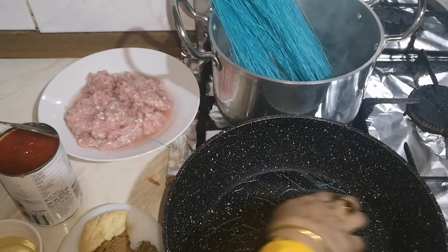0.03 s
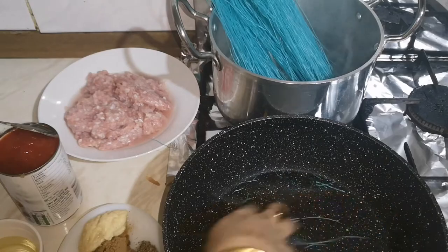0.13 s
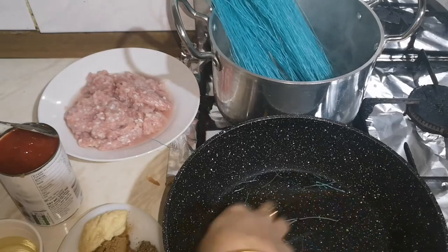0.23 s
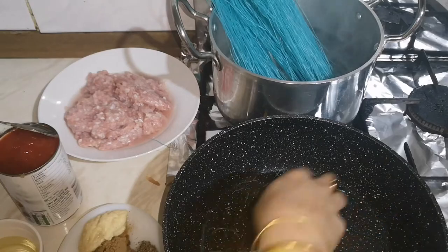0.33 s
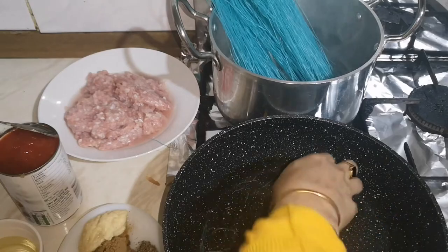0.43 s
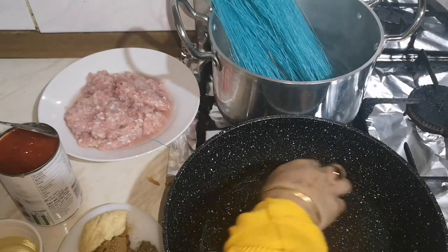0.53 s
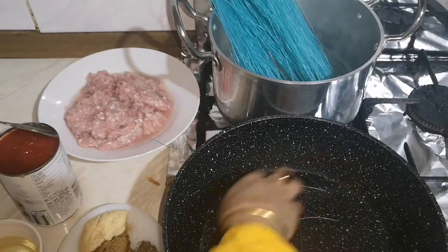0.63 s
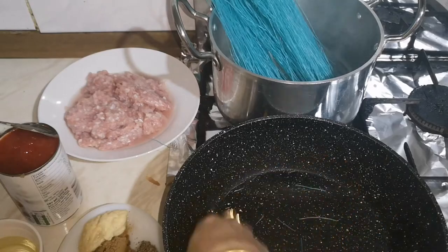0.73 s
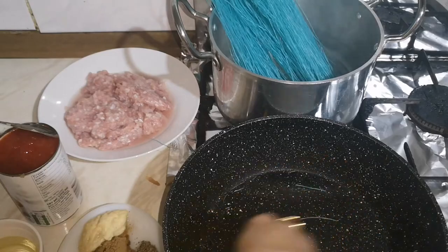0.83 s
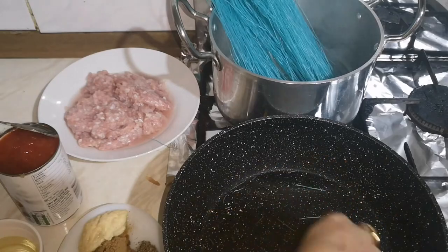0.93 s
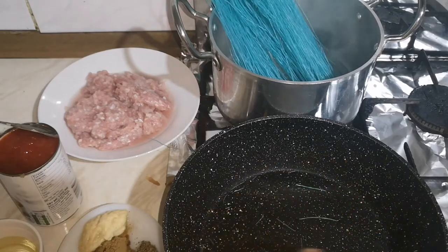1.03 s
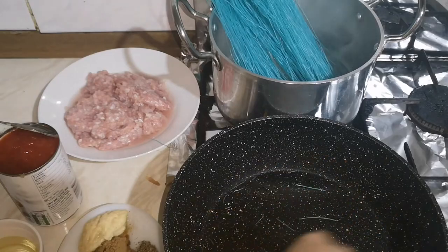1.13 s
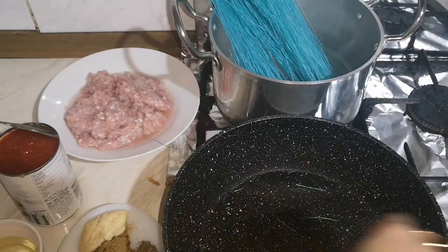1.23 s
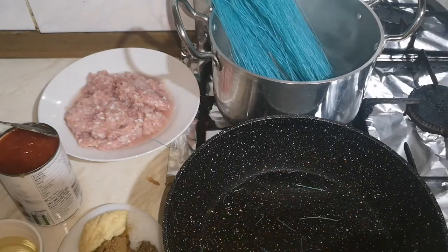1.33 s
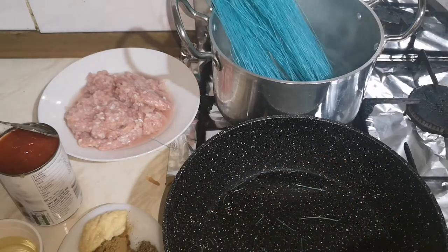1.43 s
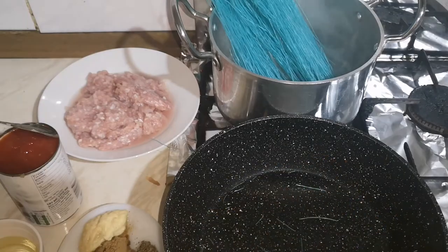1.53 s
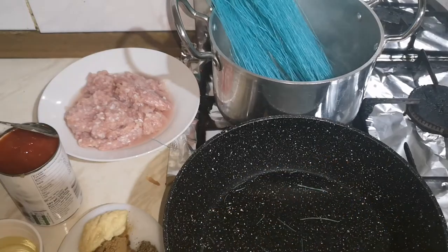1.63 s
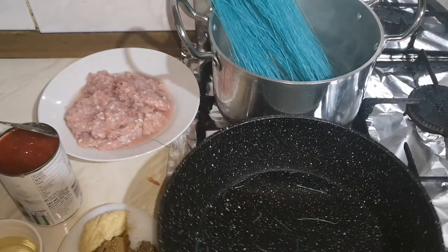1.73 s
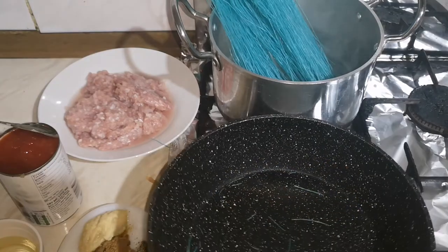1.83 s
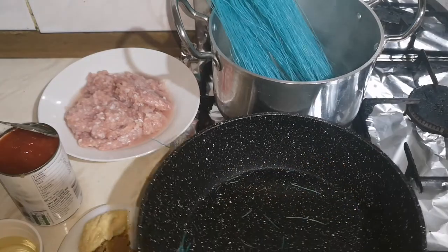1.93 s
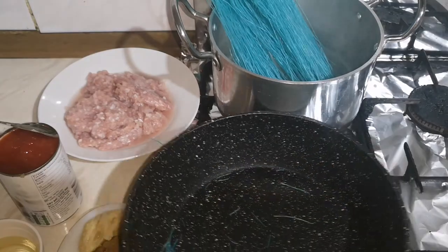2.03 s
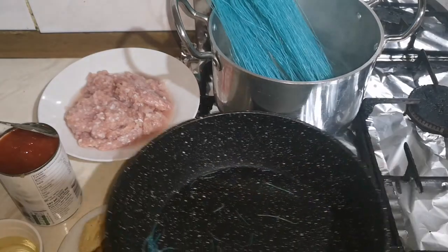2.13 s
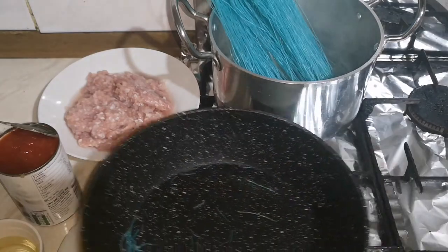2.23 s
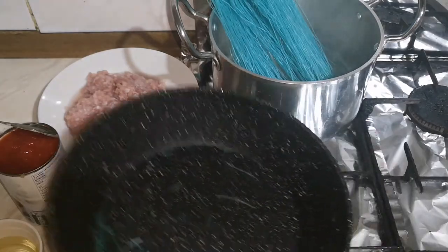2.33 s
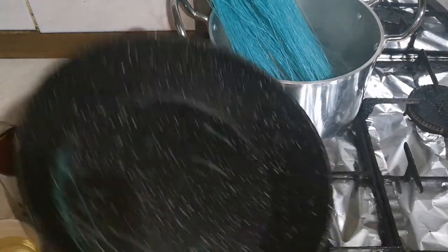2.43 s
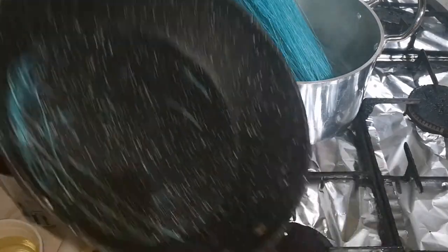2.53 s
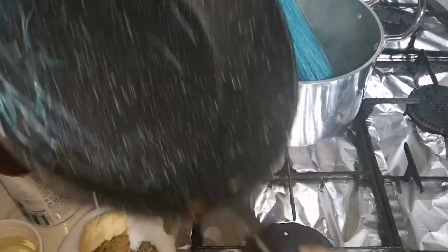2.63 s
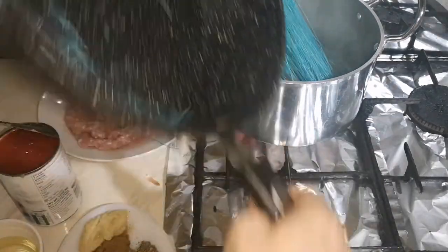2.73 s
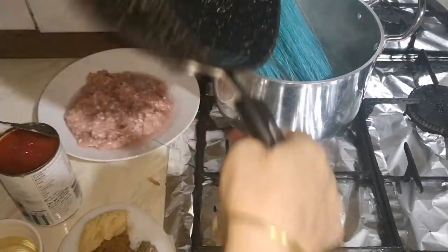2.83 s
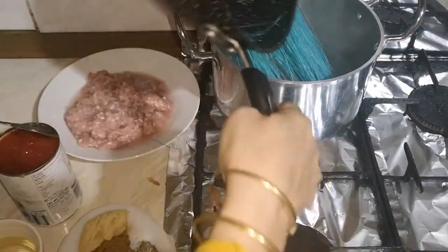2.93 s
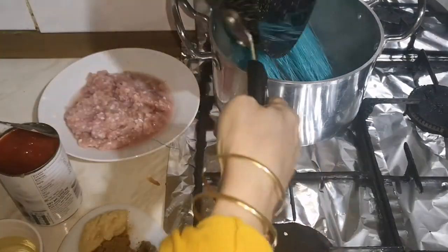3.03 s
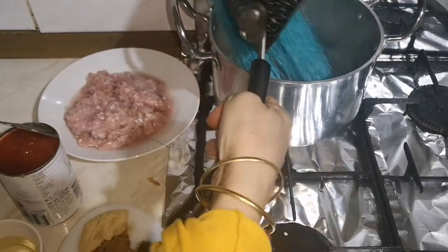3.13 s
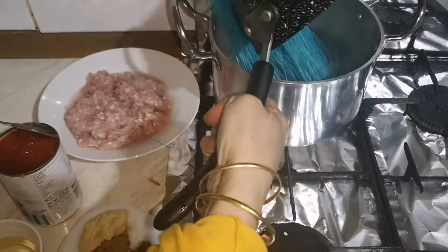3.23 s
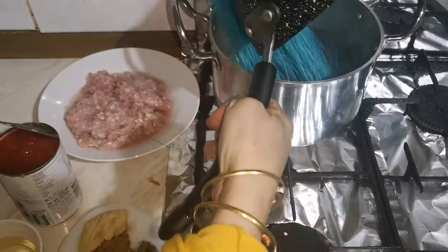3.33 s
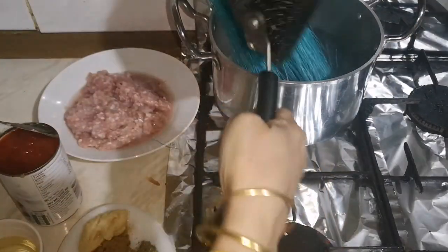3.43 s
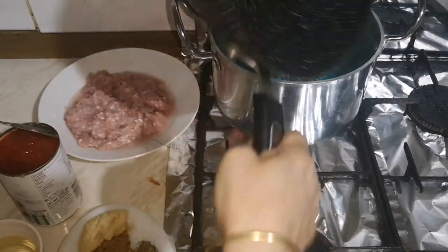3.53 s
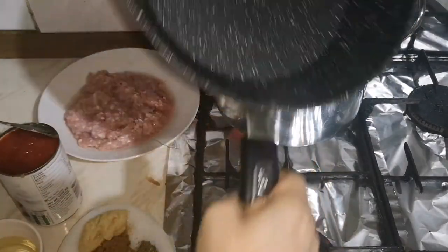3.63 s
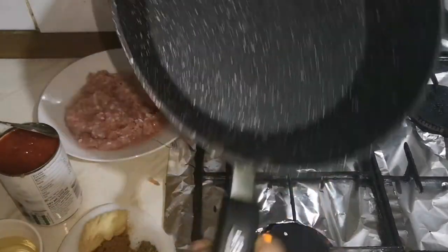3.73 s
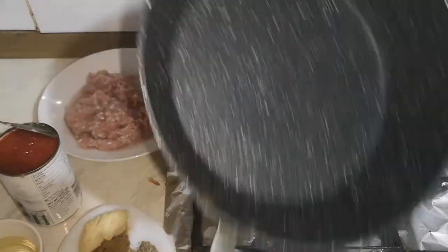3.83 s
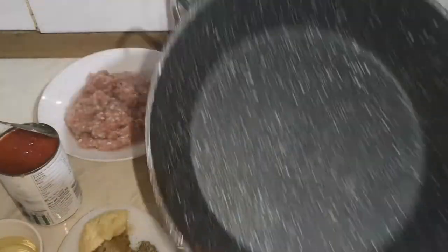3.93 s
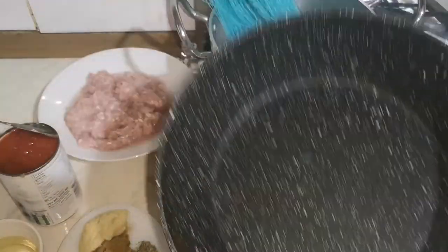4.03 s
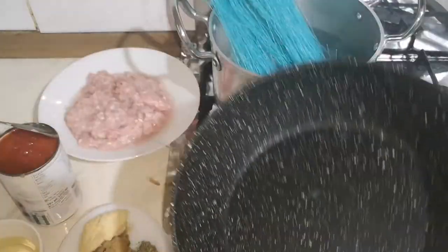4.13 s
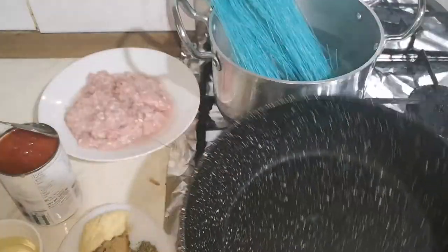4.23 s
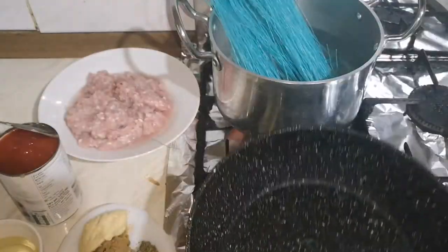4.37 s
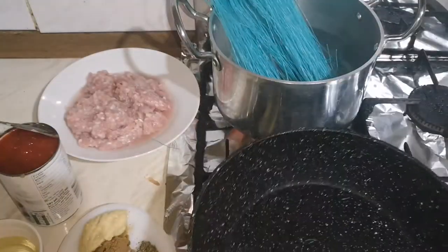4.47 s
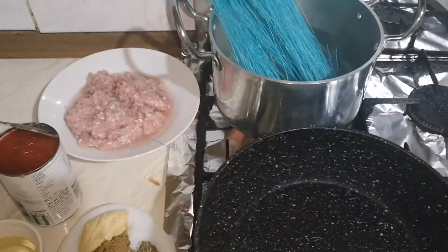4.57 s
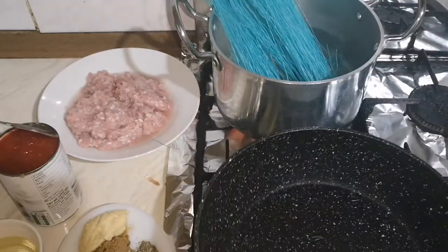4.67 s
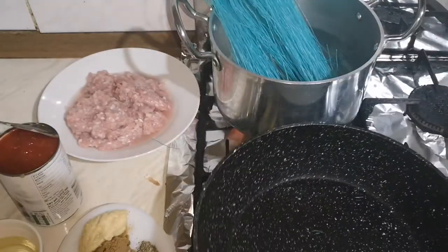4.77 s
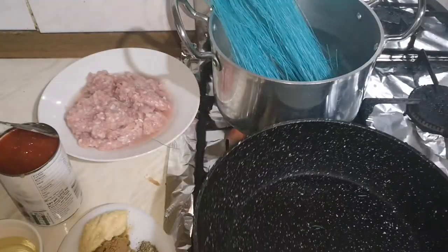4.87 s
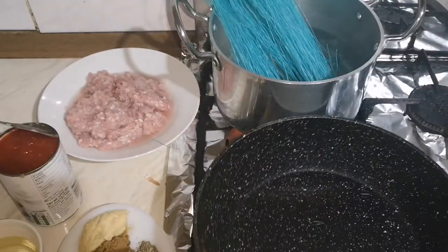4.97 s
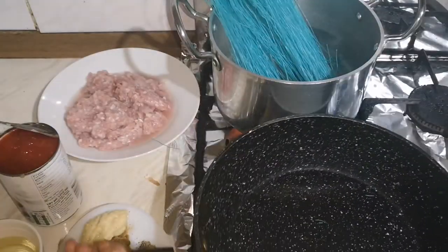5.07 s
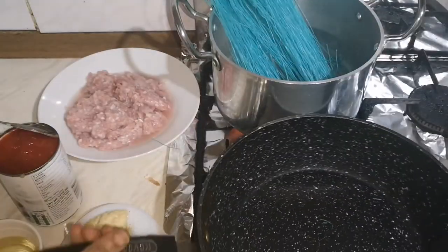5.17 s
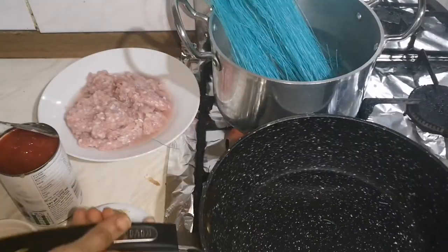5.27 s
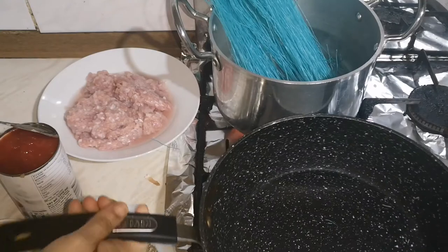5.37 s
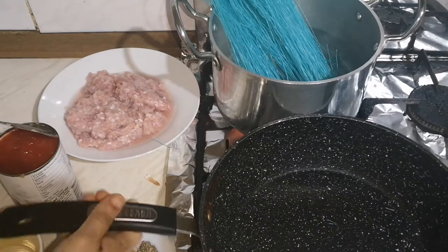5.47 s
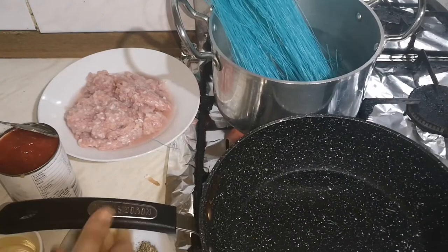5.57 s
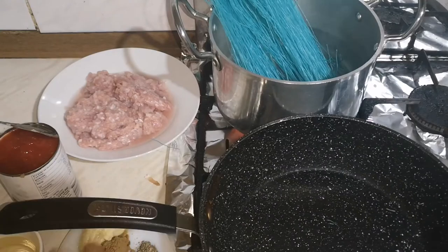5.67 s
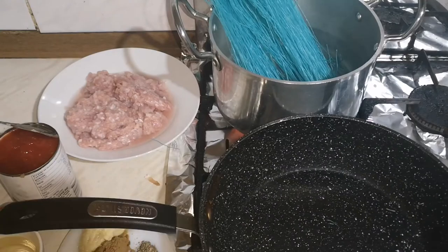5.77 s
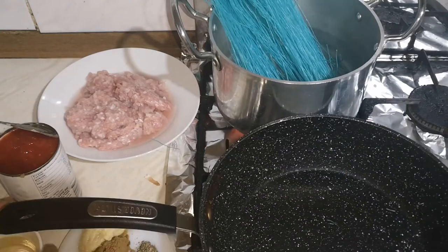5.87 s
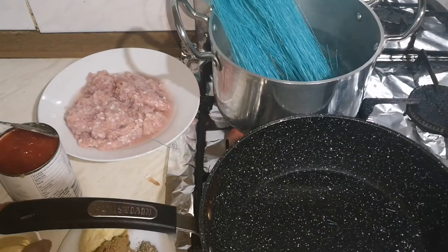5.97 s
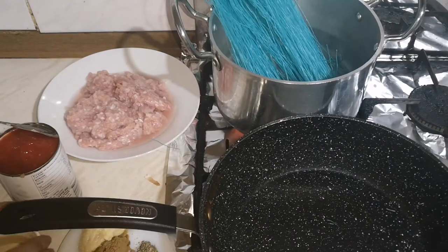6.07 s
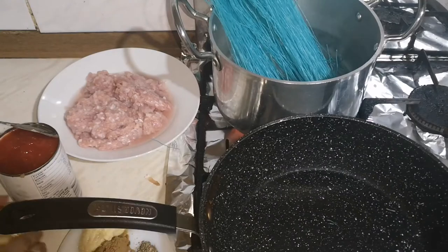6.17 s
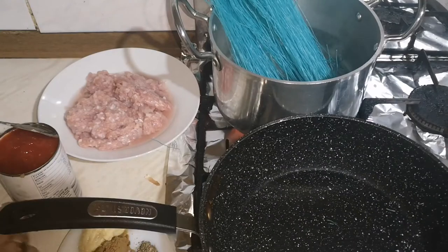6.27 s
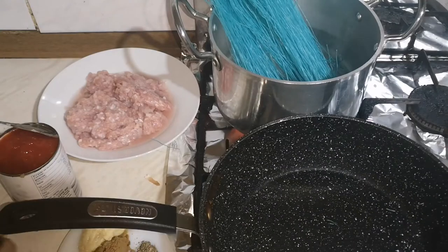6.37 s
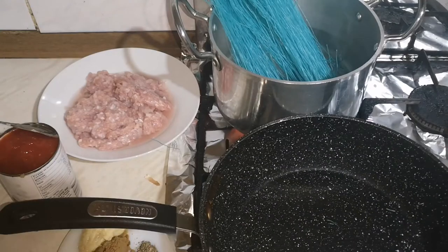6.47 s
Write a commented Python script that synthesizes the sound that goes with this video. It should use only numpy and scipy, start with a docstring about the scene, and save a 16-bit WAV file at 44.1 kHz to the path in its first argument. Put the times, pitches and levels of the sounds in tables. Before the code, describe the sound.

Close by in a small kitchen, a hand rubs a frying pan in quick, gritty strokes that make it ring. The pan knocks and scrapes off the stove grate, then crumbs slide out and fizz briefly in hot water. The handle clicks, and the pan lands with a loud metallic clatter and low thuds. A short slide, faint bangle clinks and a sleeve rustle follow. A gas burner rumbles softly throughout.

```python
"""In a small kitchen, a hand wipes out a nonstick frying pan and drags it off the grate of a gas stove. Rubbing
and knocking make the metal ring, and the handle clicks as the pan tips. Crumbs slide down into a pot of hot
water and fizz. The pan is set down with a clatter that shakes the stove, bangles clink as the hand lets go, and
a slipper scuffs softly on the floor. A burner rumbles softly throughout."""
import sys
import numpy as np
from scipy import signal
from scipy.fft import rfft, irfft, next_fast_len
from scipy.io import wavfile

SR = 44100
rng = np.random.default_rng(int(sys.argv[2]) if len(sys.argv) > 2 else 0)


def master_out(mix):
    """Clip the mix to full scale and print it as 16-bit PCM to the path in sys.argv[1]."""
    frames = np.transpose(np.atleast_2d(mix))
    ceiling = np.clip(frames, -1, 1)
    pcm = np.round(ceiling * 32767).astype(np.int16)
    wavfile.write(sys.argv[1], SR, pcm)


N = 286729
TIME = np.arange(N) / SR  # seconds since the scene began
AGE = TIME[:SR * 3 // 4]  # seconds since one short sound began
CONTACT_DAMPING = 1.3  # touched by a hand or the grate, the pan stops ringing this many times sooner

# The notes the pan rings with. A fade time is how long a sound takes to drop by 60 dB.
# Columns: pitch_hz, fade_s, struck_outside_db, rubbed_inside_db
PAN_NOTES = [(594, .12, -18, -12), (619, .3, -5, -13), (755, .14, -15, -15), (1074, .08, -9, -19),
             (1153, .12, -7, 0), (1184, .26, -7.5, -8), (1552, .09, -8, -17), (1657, .08, -7, -22),
             (1775, .07, -6, -14), (1887, .13, 2, -8), (1930, .16, -6, -3), (1985, .08, -7, -16),
             (2425, .13, -12.5, -8.5), (2520, .12, -13, -21), (2700, .08, -11, -17), (2895, .12, -7.5, -9),
             (3385, .13, -10, -13), (4028, .18, -6, -15), (4595, .14, -11, -19), (4730, .07, -10, -20),
             (5277, .14, -7, -10), (5440, .09, -8, -19), (5960, .14, -15, -18), (6325, .1, -11, -13),
             (6620, .12, -12, -16), (6950, .08, -12, -18), (7222, .12, -16, -12), (8190, .12, -20, -16)]
STRUCK = [(hz, db, fade_s) for hz, fade_s, db, _ in PAN_NOTES]
STROKED = [(hz, db, fade_s) for hz, fade_s, _, db in PAN_NOTES]
# The tone (how strong each pitch is) of pan and grate clanking. Columns: pitch_hz, level_db
CLANK_TONE = [(60, -28), (300, -8.5), (550, -6), (1000, 2), (1750, -0.5), (2300, -2), (3500, 0.5),
              (5500, 0.5), (7200, -2.5), (9500, -10), (12000, -25.5), (15500, -32.5)]


def struck_pan(clank_db, damping, clank_fade_s=0.06, crack_db=-2.0, crack_fade_s=0.02):
    """One blow on the pan: clear notes ring on after a short, noisy crack and clank."""
    crack = colour(noise(len(AGE)) * fade(crack_fade_s), [(1000, 1), (6000, 2.5), (12000, -7.0)])
    clank = unit(noise(len(AGE)) * fade(clank_fade_s)) + amp(crack_db) * unit(crack)
    notes = ring(STRUCK, scatter_db=2, damping=damping)
    return (notes + amp(clank_db) * unit(colour(clank, CLANK_TONE))) * rise(.0008)


# The pan hits the grate. Columns: start_s, level_db, treble_loss_db, thump_db, left_over_right_db
PAN_KNOCKS = [(0.5748, -38, 7, -50, 7), (1.601, -35, 34, -40, 3), (1.762, -45.5, 11, -64, 2.5),
              (1.879, -36, 33, -49, 0), (1.908, -39, 20, -47, 3), (1.967, -34, 16.5, -42, 4),
              (2.146, -46.5, 57, -46.5, 9), (4.4302, -36.5, 5, -63, -3), (4.4345, -13, 3, -28.5, 0),
              (4.463, -18.5, 6, -49, 2.5), (4.5959, -17, 5.5, -32, -0.5), (4.6608, -16.5, 8, -29.5, -2),
              (4.6909, -21.5, 9.5, -30.5, 0.5), (4.7174, -22.5, 9, -28, -1), (4.805, -19, 10.5, -26.5, 2),
              (5.0533, -36.5, 12, -36, 0), (5.295, -49, 0.5, -62, -0.5)]
# The low notes of the grate and stove top. Columns: pitch_hz, level_db, fade_s
STOVE_NOTES = [(53, -9, .35), (114, 0, .36), (155, -8, .22), (292, -14, .3), (313, -15, .3)]
# The stove's dull thud. Columns: pitch_hz, level_db
THUD_TONE = [(25, -13.5), (50, 3), (100, -1), (190, -4.5), (300, -21), (500, -18), (1500, -47.5)]


def knocks(stove_rise_s=.008, thud_db=-3.5, thud_fade_s=0.36):
    """Each knock rings the pan, brighter for a harder contact; the heavy stove shakes a moment later."""
    pan, stove = np.zeros((2, 2, N))
    for start_s, db, dull_db, thump_db, side_db in PAN_KNOCKS:
        mid_db = -5 + 0.58 * dull_db  # a duller blow puts more into the pan's lowest notes
        tone = [(600, 0.5 * mid_db - 2.5), (1150, mid_db), (1800, 0.0016),
                (2400, -.25 * dull_db), (4200, -dull_db)]
        blow = colour(struck_pan(clank_db=1.2, damping=CONTACT_DAMPING), tone)
        add(pan, start_s, sides(side_db) * starting_at(db, blow))
        thud = unit(colour(noise(len(AGE)), THUD_TONE) * fade(thud_fade_s))
        thump = (ring(STOVE_NOTES) + amp(thud_db) * thud) * rise(stove_rise_s)
        add(stove, start_s, starting_at(thump_db, thump, first_s=0.05))
    return pan, stove


# The hand sweeps over the pan. Columns: touch_s, fastest_s, half_length_s, ring_db, hiss_db
HAND_STROKES = [(0.0, 0.177, 0.072, -36, -40), (.31, 0.312, 0.087, -74, -54),
                (0.538, 0.601, 0.086, -34.5, -52.5), (0.59, 0.717, 0.075, -28.5, -35),
                (.82, 0.862, 0.037, -75, -51.5), (1.061, 1.088, 0.051, -36.5, -56),
                (5.45, 5.518, 0.046, -59.5, -72.5)]


def strokes(touch_rise_s=0.0016, rock_db=-19):
    """The hand lands, speeds up and slows; returns how strongly the pan rings, hisses and rocks."""
    ringing, hissing, rocking = np.zeros((3, N))
    for touch_s, fastest_s, half_length_s, ring_db, hiss_db in HAND_STROKES:
        contact = rise(touch_rise_s, np.maximum(TIME - touch_s, 0))
        speed = 1 / (1 + ((TIME - fastest_s) / half_length_s) ** 2)
        # All three grow with speed: the ring most steeply, the rocking least.
        ringing = np.hypot(ringing, contact * amp(ring_db) * speed ** 3.02)
        hissing = np.hypot(hissing, contact * amp(hiss_db) * speed ** 1.92)
        rocking = np.hypot(rocking, contact * amp(ring_db + rock_db) * speed ** 0.88)
    return ringing, hissing, rocking


# Rubbing on the pan: its low, gritty and hissing parts. Columns: pitch_hz, level_db
SKIN_TONE = [(200, -10), (430, -11.5), (600, 3), (900, 1.5), (1200, 7), (1900, 4), (3000, -12.5),
             (6000, -24.5)]
GRIT_TONE = [(900, -13.5), (1600, 2.5), (2400, 1), (3200, 2.5), (4100, -0.5), (5300, 2), (7000, -8),
             (12000, -26)]
HISS_TONE = [(1000, -30.5), (3000, -13), (5000, -7), (6200, 1), (7200, 2.5), (9300, -0.5), (11000, -14.5),
             (15000, -21.5)]


def wipes():
    """Skin rubs the coating and damps the pan; the more it hisses, the more the high notes ring."""
    ringing, hissing = np.array(strokes()[:2]) * slips(per_s=3000, spread_db=1.0)
    low = rubbed(ringing, STROKED, SKIN_TONE, direct_db=-2)
    grit = rubbed(np.sqrt(ringing * hissing), STROKED, GRIT_TONE, direct_db=-5)
    hiss = rubbed(hissing, STROKED, HISS_TONE, direct_db=1.5)
    return low + amp(2.0) * grit + sides(0.99) * echoes(hiss)


# One pull drags the pan off the grate. Columns: time_s, scrape_db, hiss_db
PULL_LEVELS = [(1.68, -56, -68.5), (1.716, -57.5, -74), (1.794, -43.5, -52.5), (1.92, -46.5, -65),
               (1.99, -41.5, -57.5), (2.08, -50, -57), (2.174, -40.5, -58.5), (2.25, -73, -98),
               (2.3, -128, -84)]
# The pan slides a little further after landing. Columns: start_s, length_s, level_db
LANDING_SLIDES = [(4.925, 0.036, -56), (5.053, 0.22, -47.5)]
# The pull's scrape, the stove's shudder under it, and the landing slides. Columns: pitch_hz, level_db
IRON_TONE = [(200, -3.5), (450, 14.5), (750, 9), (1160, 9), (1900, 0.5), (3000, 0.5), (5000, -14),
             (7000, -16), (12000, -30)]
SHUDDER_TONE = [(25, -4), (50, 5.5), (100, -6.5), (190, -0.5), (300, -8), (500, -26), (1500, -54)]
SLIDE_TONE = [(200, 3), (620, 3.5), (1200, 3.5), (1930, 0), (2500, 2.5), (4100, -10), (5400, -25.5),
              (7000, -1), (12000, -34)]


def drags():
    """The pan scrapes over cast iron; the stove rumbles under that and when wiping rocks the pan."""
    catches = slips(per_s=500, spread_db=3.5)
    pull, pull_hiss = levels(PULL_LEVELS) * catches
    slide = catches * sum(amp(db) * push(start_s, length_s, rise_s=.01, fade_s=0.76, sag_db_per_s=46)
                          for start_s, length_s, db in LANDING_SLIDES)
    scrape = rubbed(pull, STRUCK, IRON_TONE, direct_db=3.5)
    scrape += rubbed(slide, STRUCK, SLIDE_TONE, direct_db=2.5)
    hiss = rubbed(amp(3.0) * pull_hiss + amp(-8) * slide, STRUCK, HISS_TONE, direct_db=3.5)
    hiss = colour(hiss, [(5000, 9), (8000, -4.5), (13000, 0)])
    _, _, rocking = strokes()
    rumble = rubbed(amp(-2) * pull, STOVE_NOTES, SHUDDER_TONE, direct_db=15, damping=1.15)
    rumble += rubbed(amp(9.5) * slide + rocking, STOVE_NOTES, THUD_TONE, direct_db=16.5, damping=3.2)
    return scrape + sides(2.1) * hiss, rumble


# Crumbs land in the hot water. Columns: start_s, level_db, fade_s
POT_SPLASHES = [(3.38, -31, 0.25), (3.404, -37.5, 0.2), (3.457, -40, 0.19), (3.484, -30.5, 0.11),
                (3.504, -47, 0.27), (3.615, -54.5, 0.2), (3.64, -57, 0.11)]
# The water's bright fizz. Columns: pitch_hz, level_db
FIZZ_TONE = [(290, -66), (500, -31), (748, -20), (1100, -20.5), (1930, -8.5), (6930, -2.5), (7670, 2),
             (9510, -0.5), (12000, -13.5), (14600, -13), (15500, -18)]


def splashes():
    """The hot pot spits in short, fine bursts as crumbs fall in."""
    fizz = unit(colour(slips(per_s=3900, spread_db=1) * noise(N), FIZZ_TONE))
    return sides(-2.1) * bursts(POT_SPLASHES, rise_s=0.0005) * fizz


# Crumbs slide each time the pan tips further. Columns: start_s, length_s, hiss_db, ring_db
CRUMB_SLIDES = [(2.534, 0.11, -70.5, -70), (2.723, 0.28, -57, -68), (2.994, 0.15, -49, -59.5)]
# The pan's ring under the crumbs. Columns: pitch_hz, level_db
CRUMB_TONE = [(600, 11.5), (1200, 7), (1900, 10), (3000, 10), (5000, 5), (9000, -24)]


def crumbs():
    """Dry crumbs skitter down the tilted pan, hissing and making it ring."""
    slides = sum(amp([[ring_db], [hiss_db]]) * push(start_s, length_s, rise_s=0.029, fade_s=0.43)
                 for start_s, length_s, hiss_db, ring_db in CRUMB_SLIDES)
    ringing, hissing = slides * slips(per_s=2500, spread_db=1.5)
    pan = rubbed(ringing, STRUCK, CRUMB_TONE, direct_db=2.5, damping=1.0)
    hiss = rubbed(hissing, STRUCK, HISS_TONE, direct_db=10, damping=0.48)
    return amp(1.0) * pan + amp(2.5) * sides(1.7) * hiss


# The ticking of dry pasta bits. Columns: pitch_hz, level_db
PASTA_TONE = [(800, -23), (2400, -4), (3300, -1.5), (4200, -7), (7000, 3), (10000, -11.5), (15000, -19)]


def pasta_bits():
    """Dry bits of pasta catch under the wiping hand and tick on the pan."""
    ticking = unit(tiny_kicks(per_s=120, spread_db=1))
    _, hissing, _ = strokes()
    return rubbed(amp(-14.5) * hissing ** .9 * ticking, STRUCK, PASTA_TONE, direct_db=0.5, damping=3.8)


# The handle clicks in its bracket. Columns: start_s, click_db, click_fade_s, ring_db
HANDLE_CLICKS = [(1.355, -64, 0.5, -69), (1.46, -65.5, 0.54, -72), (1.51, -59, 0.12, -59),
                 (2.511, -53, 0.13, -60.5), (3.775, -63, 0.68, -72), (3.811, -50.5, 0.18, -56.5),
                 (3.845, -62, 0.15, -60), (4.084, -40, 0.084, -47.5), (4.1515, -58.5, 0.2, -47)]
# The click itself, and the pan's ring when jolted through the handle. Columns: pitch_hz, level_db
CLICK_TONE = [(1000, -8), (2600, -6.5), (3600, -11.5), (4700, -8.5), (5400, -2), (6100, 1), (7000, -4),
              (8000, -15.5), (14000, -32.5)]
JOLT_TONE = [(620, 8), (1150, 11), (1800, -5), (2900, 8.5), (4200, -4.5), (7000, -4.5), (10000, -10)]


def handle_clicks():
    """The handle clicks as it is gripped and turned; returns the clicks and the pan's free ring."""
    pan = np.zeros((2, N))
    for start_s, _, _, ring_db in HANDLE_CLICKS:
        jolt = colour(struck_pan(clank_db=-14, damping=1), JOLT_TONE)
        add(pan, start_s, starting_at(ring_db, jolt))
    loudness = bursts([row[:3] for row in HANDLE_CLICKS], rise_s=0.00091)
    return unit(colour(noise(N), CLICK_TONE)) * loudness, sides(-2.0) * pan


# The hand shifts its grip. Columns: start_s, length_s, level_db
GRIP_SHIFTS = [(2.806, 0.052, -62), (5.125, .16, -55), (5.397, 0.079, -62)]
# The pan's hum when its handle is rubbed. Columns: pitch_hz, level_db
GRIP_TONE = [(600, -22), (1200, -52), (1900, -0.5), (2600, -10), (4200, -4.5), (7000, -12)]


def grips():
    """Fingers rub the handle, which passes the shaking on to the pan."""
    force = sum(amp(db) * push(start_s, length_s, rise_s=0.016, fade_s=0.26)
                for start_s, length_s, db in GRIP_SHIFTS)
    return rubbed(force, STRUCK, GRIP_TONE, direct_db=-6)


# The bangles touch. Columns: start_s, level_db
BANGLE_CLINKS = [(.427, -62), (5.769, -67), (5.787, -64), (5.806, -58), (5.818, -60)]
# The notes they ring with. Columns: pitch_hz, level_db, fade_s
BANGLE_NOTES = [(5240, 1, 0.1), (7600, 3.5, 0.3), (8300, 1, 0.13), (10200, 3, 0.037), (11800, 0.5, 0.12),
                (12520, 1, 0.12), (13650, -26, 0.27), (15100, -12, .15)]


def bangles(rattle_db=-3, rattle_fade_s=0.052):
    """Thin metal rings touch faintly on the wrist and chatter against each other."""
    out = np.zeros((2, N))
    rattle_tone = [(3000, -35), (7000, -3), (9500, 5), (15000, -6)]
    for start_s, db in BANGLE_CLINKS:
        rattle = unit(colour(noise(len(AGE)) * fade(rattle_fade_s), rattle_tone))
        clink = ring(BANGLE_NOTES, scatter_db=2.5, damping=1.8) + amp(rattle_db) * rattle
        add(out, start_s, starting_at(db, clink))
    return out


# A slipper scuffing the floor. Columns: pitch_hz, level_db
SCUFF_TONE = [(200, 8), (450, -3), (1800, -0.5), (3500, -10), (6000, -13.5), (7300, -4.5), (10000, -18.5),
              (15000, -29)]


def scuff(level_db=-58.5):
    """A slipper scuffs softly on the floor."""
    movement = push(start_s=6.04, length_s=0.12, rise_s=0.019, fade_s=0.55)
    return amp(level_db) * movement * unit(colour(noise(N), SCUFF_TONE))


# The steady sound of burner and room. Columns: pitch_hz, level_db
BURNER_TONE = [(12, -26), (20, 0.5), (109, -5), (259, -21.5), (324, -19.5), (491, -27.5), (631, -32.5),
               (881, -30.5), (1040, -26.5), (1300, -30), (2610, -28.5), (3960, -35.5), (4310, -35),
               (6360, -34), (15500, -51)]
# Low hums under the flame. Columns: pitch_hz, width_hz, level_db
BURNER_HUMS = [(113, 18, -64), (208.5, 5.5, -72)]


def burner(flame_db=-59):
    """The gas flame rumbles and hisses; two narrow bands of noise hum beneath it."""
    out = amp(flame_db) * unit(colour(noise(N), BURNER_TONE, size=16384))
    for hz, width_hz, db in BURNER_HUMS:
        band = signal.iirpeak(hz, hz / width_hz, fs=SR)
        out += amp(db) * unit(signal.lfilter(*band, noise(N)))
    return out


# Sound bounces off the pot, worktop and wall. Columns: left_delay_s, right_delay_s, level_db
NEAR_ECHOES = [(.0019, 0.002, -26), (.0043, .0035, 0), (.0068, .0081, -19), (0.0121, 0.012, -7.5)]


def echoes(x):
    """Very quick echoes from hard surfaces add a metallic tone at about the same loudness."""
    out = x.copy()
    for *delays, db in NEAR_ECHOES:
        for channel, delay_s in enumerate(delays):
            add(out[channel][None], delay_s, amp(db) * x[channel][None])
    return out / np.sqrt(1 + sum(amp(db) ** 2 for *_, db in NEAR_ECHOES))


# How long each pitch lingers in the room. Columns: pitch_hz, fade_s
ROOM_FADES = [(200, 0.4), (1000, 0.37), (4000, 0.26), (8000, 0.33), (15000, 0.25)]


def kitchen(x, echo_db, build_s=0.0012):
    """Adds the room: a blur of echoes that builds quickly and dies sooner in the treble."""
    hz, t, spectrum = signal.stft(noise(len(AGE)), SR, nperseg=256)
    spectrum = spectrum * fade(look_up(ROOM_FADES, hz)[:, None], t)
    tail = signal.istft(spectrum, SR, nperseg=256)[1][:, :len(AGE)]
    tail *= rise(build_s) ** 2
    tail /= np.linalg.norm(tail[0])
    return x + amp(echo_db) * signal.oaconvolve(x, tail, axes=1)[:, :N]


# How alike left and right are (1 = the same, 0 = unrelated). Columns: pitch_hz, likeness
SIDE_LIKENESS = [(60, .999), (150, .99), (200, .93), (300, .5), (600, .45), (1200, .5), (2500, .1),
                 (5000, 0)]


def noise(size):
    """White noise for two ears, alike in the bass and unrelated in the treble."""
    padded = next_fast_len(size + size % 2, True)
    left, other = rfft(rng.standard_normal((2, padded)))
    likeness = look_up(SIDE_LIKENESS, np.linspace(0, SR / 2, len(left)))
    right = likeness * left + np.sqrt(1 - likeness ** 2) * other
    return irfft([left, right], padded)[:, :size]


def ring(notes, scatter_db=0, damping=1):
    """Metal rings with fading notes. The spot hit varies their strength; damping shortens them."""
    out = np.zeros((2, len(AGE)))
    for hz, db, fade_s in notes:
        side_shift = np.arccos(look_up(SIDE_LIKENESS, hz)) * rng.choice([-.5, .5])
        phase = rng.uniform(0, 2 * np.pi) + np.array([[side_shift], [-side_shift]])
        strength = amp(db + scatter_db * rng.standard_normal((2, 1))) / np.sqrt(fade_s)
        out += strength * np.sin(2 * np.pi * hz * AGE + phase) * fade(fade_s / damping)
    return unit(out)


def rubbed(force, notes, tone, direct_db, damping=CONTACT_DAMPING):
    """Rubbing rings the metal's notes and is also heard directly; the force sets the level."""
    body = ring(notes, damping=damping)
    body /= np.linalg.norm(body[0])
    ringing = signal.oaconvolve((force * rng.standard_normal(N))[None], body, axes=1)[:, :N]
    direct = amp(direct_db) * force * noise(N)
    return unit(colour(ringing + direct, tone)) * np.sqrt(np.mean(force ** 2))


def tiny_kicks(per_s, spread_db):
    """Single spikes of uneven size at random moments."""
    sizes = amp(spread_db * np.minimum(rng.exponential(1, N), 4))
    return sizes * (rng.random(N) < per_s / SR)


def slips(per_s, spread_db):
    """The strength of rubbing from moment to moment: tiny slips on top of a smooth slide."""
    return unit(np.sqrt(1 + unit(tiny_kicks(per_s, spread_db)) ** 2))


def push(start_s, length_s, rise_s, fade_s, sag_db_per_s=0):
    """The loudness of a short movement: it builds up, holds or sags, then dies away."""
    t = np.maximum(TIME - start_s, 0)
    sag = amp(-sag_db_per_s * np.minimum(t, length_s))
    return rise(rise_s, t) * sag * fade(fade_s, np.maximum(t - length_s, 0))


def bursts(rows, rise_s):
    """A loudness curve that jumps up and dies away once for each row."""
    out = np.zeros((1, N))
    for start_s, db, fade_s in rows:
        add(out, start_s, amp(db) * (fade(fade_s) * rise(rise_s))[None])
    return out


def levels(rows):
    """Turns each dB column into a loudness curve, silent outside the listed times."""
    times, *columns = np.transpose(rows)
    sounding = (TIME > times[0]) & (TIME < times[-1])
    return [amp(np.interp(TIME, times, db)) * sounding for db in columns]


def colour(x, tone, size=4096):
    """Turns each pitch up or down by a tone table, with no ringing ahead of the sound."""
    log_gain = np.log(amp(look_up(tone, abs(np.fft.fftfreq(size, 1 / SR)))))
    taps = np.fft.ifft(np.exp(np.conj(signal.hilbert(log_gain)))).real
    return signal.oaconvolve(x, taps[None, :size // 2], axes=1)[:, :x.shape[1]]


def look_up(table, hz):
    """A table's value at any pitch, gliding between its rows."""
    pitches, values = np.transpose(table)
    return np.interp(np.log(hz + 1), np.log(pitches + 1), values)


def rise(rise_s, t=AGE):
    """Climbs from 0 towards 1, about two thirds of the way in rise_s."""
    return 1 - np.exp(-t / rise_s)


def fade(fade_s, t=AGE):
    """Falls from 1, dropping 60 dB in fade_s."""
    return np.exp(-np.log(1000) * t / fade_s)


def amp(db):
    """Turns decibels into a number to multiply by."""
    return 10 ** (np.asarray(db) / 20)


def unit(x):
    """Scales a sound to an average (RMS) level of 1."""
    return x / np.sqrt(np.mean(x ** 2) + 1e-20)


def starting_at(db, sound, first_s=0.01):
    """Scales a sound so that its first moments have the given level."""
    return amp(db) * sound / sound[:, :round(first_s * SR)].std()


def sides(db):
    """Left and right volumes, with the left louder by db."""
    return amp(np.array([[db], [-db]]) / 2)


def add(mix, start_s, sound):
    """Adds a sound into the mix at the given time."""
    part = mix[:, round(start_s * SR):][:, :sound.shape[1]]
    part += sound[:, :part.shape[1]]


def scene():
    """Pan, pot and bangles in the kitchen, over the rumble of the stove."""
    blows, thumps = knocks()
    scrapes, rumble = drags()
    clicks, handle_ring = handle_clicks()
    near = wipes() + echoes(pasta_bits() + scrapes + crumbs() + splashes() + clicks)
    near = near + grips() + scuff()
    in_room = kitchen(blows + handle_ring, echo_db=-4.5)
    in_room += kitchen(near, echo_db=-21.5)
    in_room += kitchen(bangles(), echo_db=-0.5)
    return in_room + thumps + rumble + burner()


# How much louder the left side is at each pitch. Columns: pitch_hz, left_over_right_db
SIDE_BALANCE = [(200, 0), (380, 1.5), (700, -0.5), (1300, -0.5), (2400, 1.5), (4400, -0.5), (8100, 4.5),
                (10500, -9.5), (13000, -2)]


def record(dry, top_hz=15500):
    """Gives left and right a slightly different tone, then cuts the very highest treble."""
    left = colour(dry[:1], [(hz, db / 2) for hz, db in SIDE_BALANCE])
    right = colour(dry[1:], [(hz, -db / 2) for hz, db in SIDE_BALANCE])
    treble_cut = signal.firwin(511, top_hz, window=("kaiser", 9), fs=SR)
    return signal.oaconvolve(np.vstack([left, right]), treble_cut[None], "same")


dry = scene()
out = record(dry)
master_out(out)
```